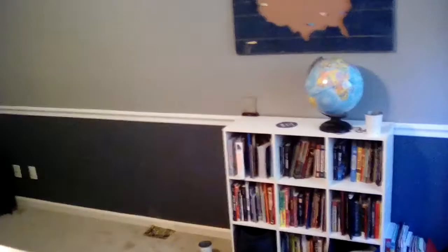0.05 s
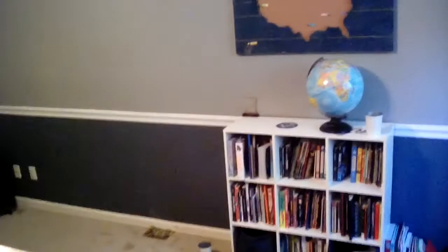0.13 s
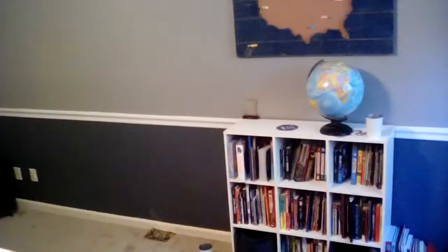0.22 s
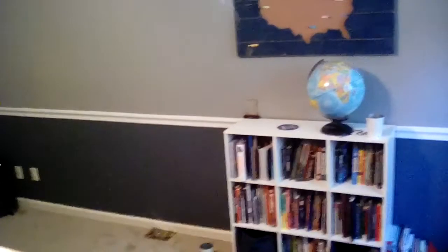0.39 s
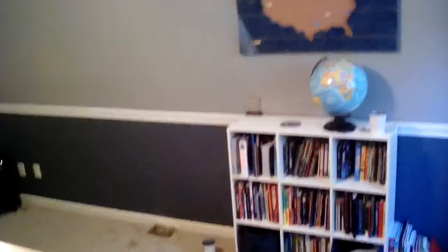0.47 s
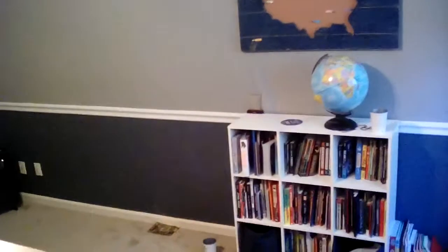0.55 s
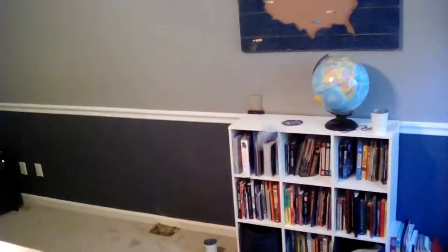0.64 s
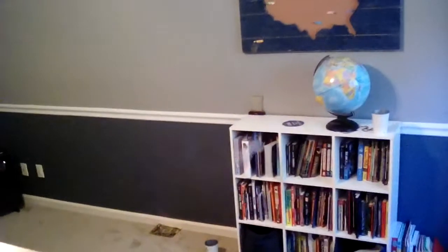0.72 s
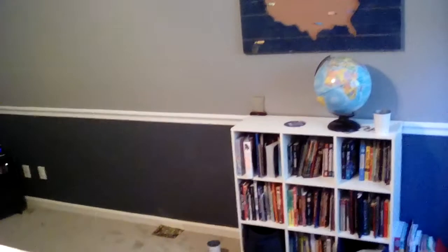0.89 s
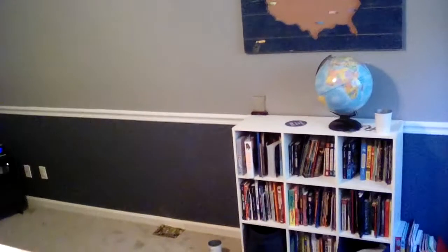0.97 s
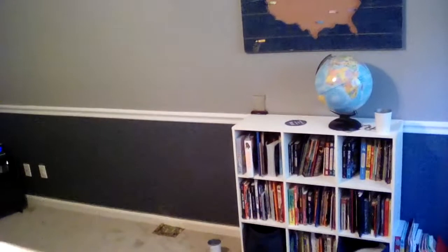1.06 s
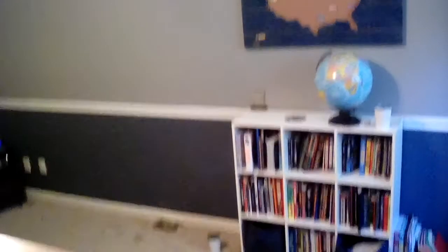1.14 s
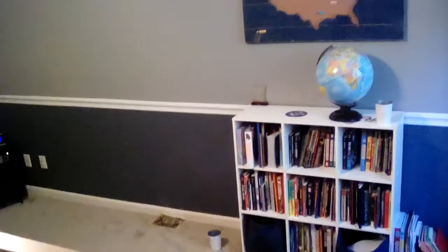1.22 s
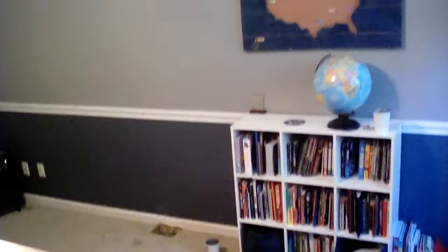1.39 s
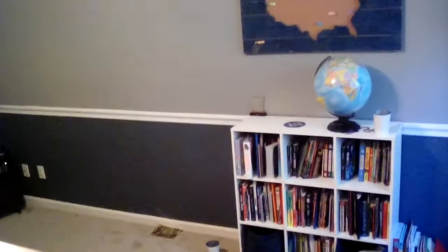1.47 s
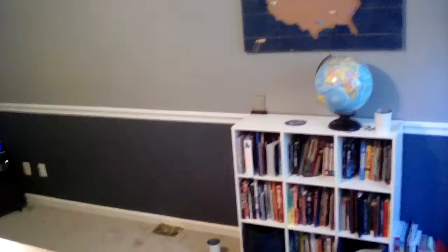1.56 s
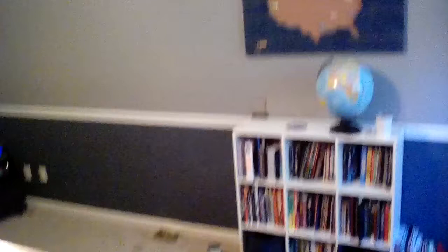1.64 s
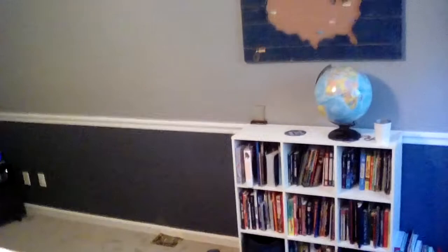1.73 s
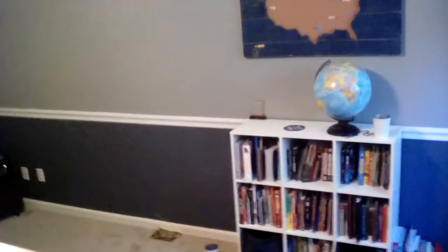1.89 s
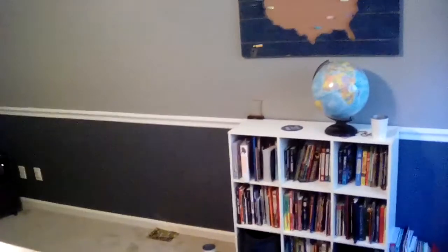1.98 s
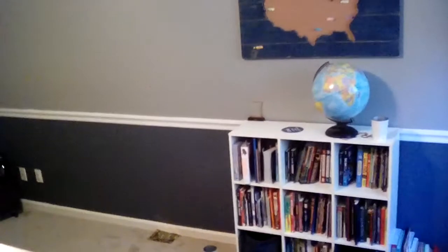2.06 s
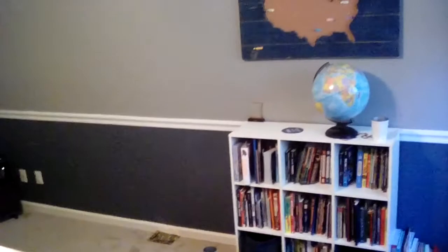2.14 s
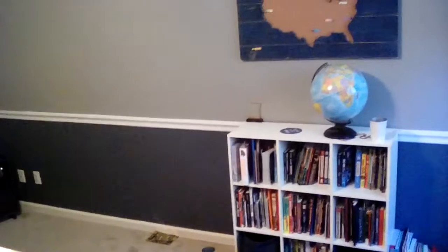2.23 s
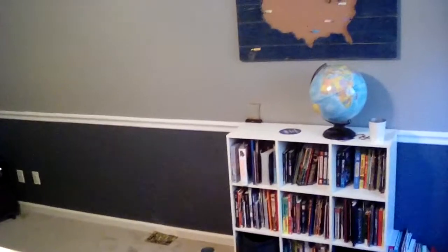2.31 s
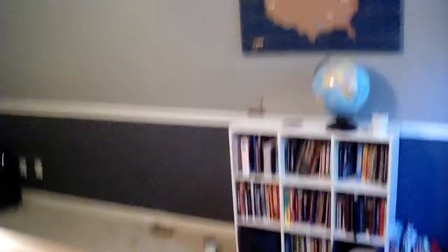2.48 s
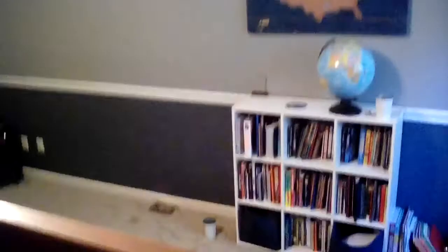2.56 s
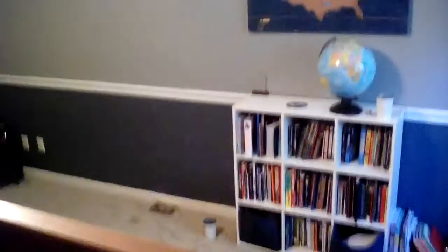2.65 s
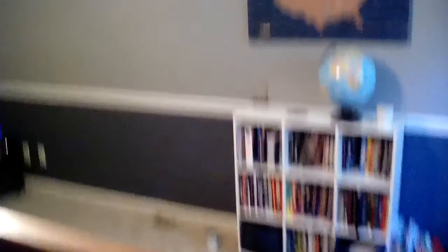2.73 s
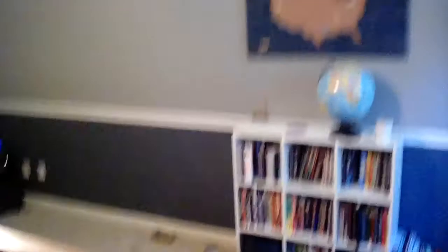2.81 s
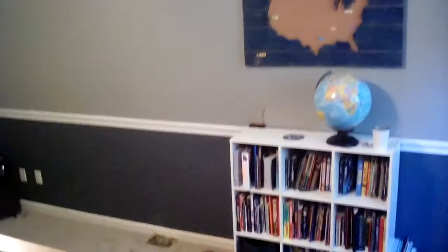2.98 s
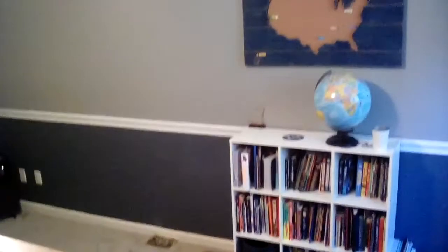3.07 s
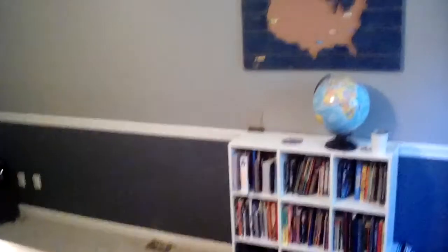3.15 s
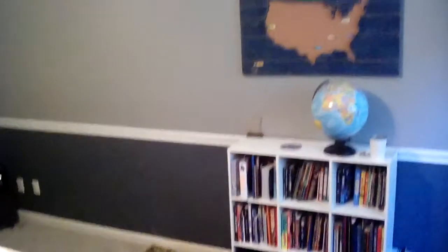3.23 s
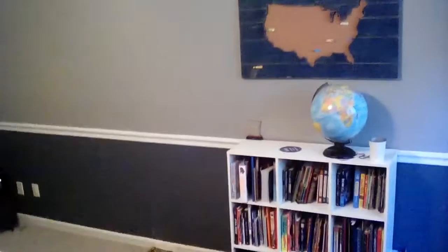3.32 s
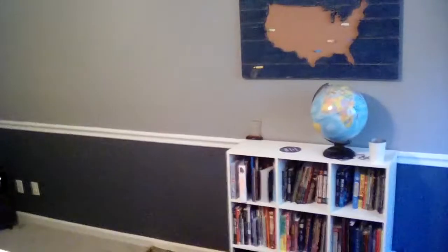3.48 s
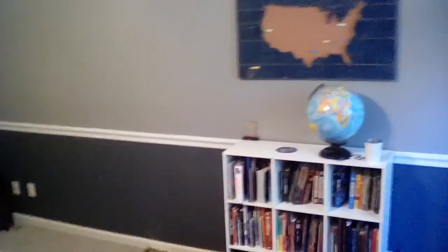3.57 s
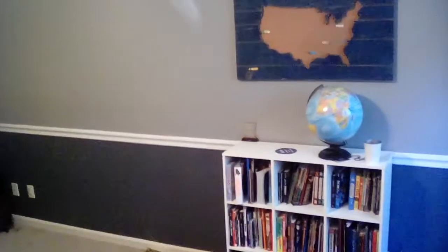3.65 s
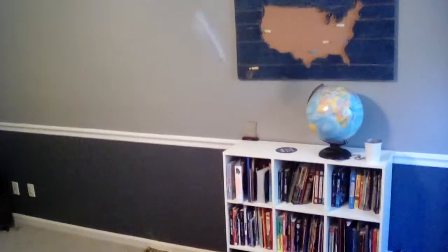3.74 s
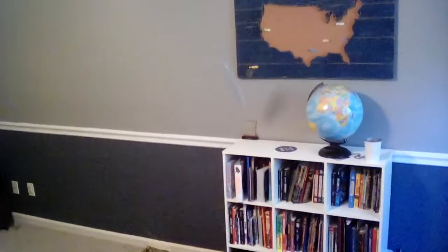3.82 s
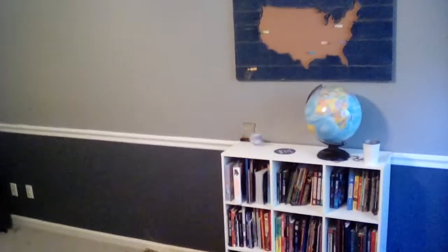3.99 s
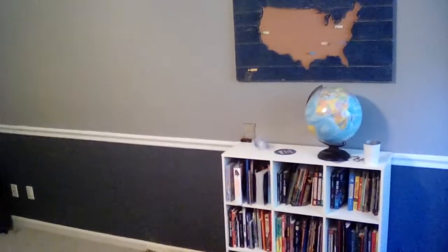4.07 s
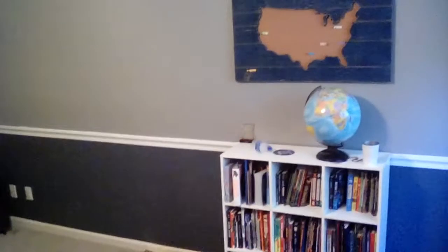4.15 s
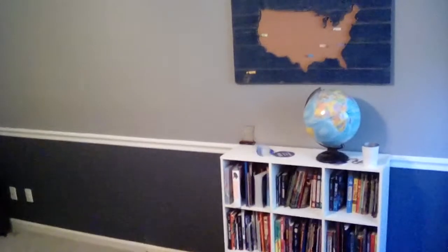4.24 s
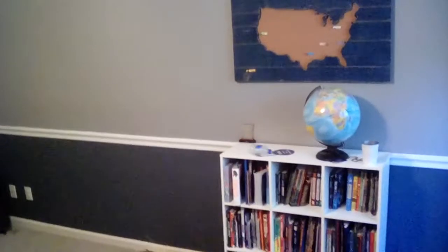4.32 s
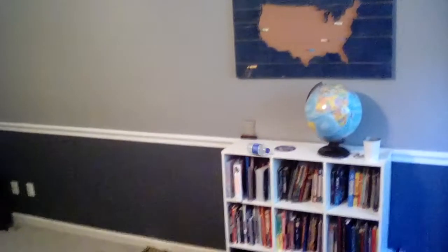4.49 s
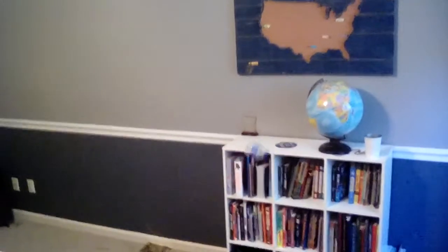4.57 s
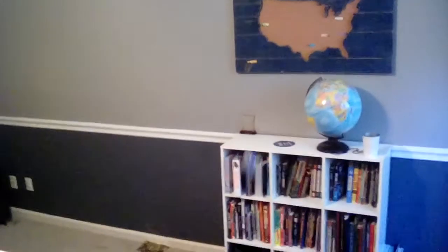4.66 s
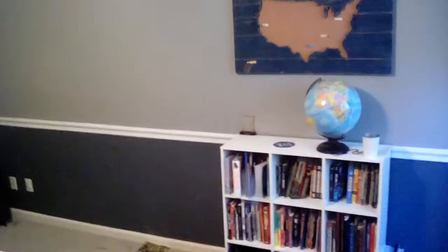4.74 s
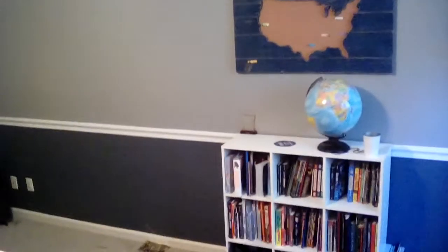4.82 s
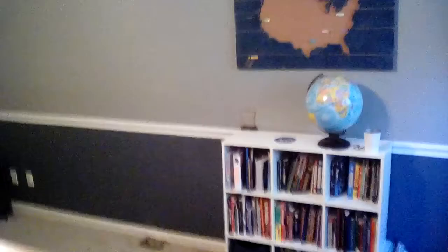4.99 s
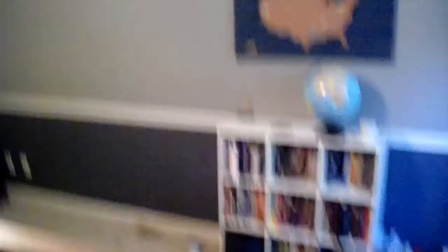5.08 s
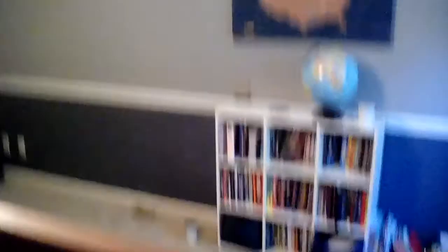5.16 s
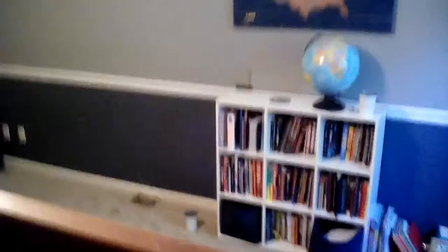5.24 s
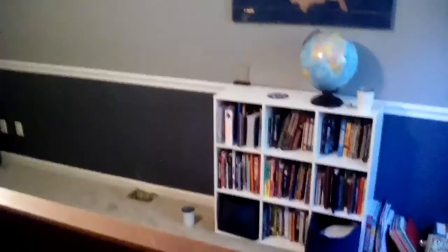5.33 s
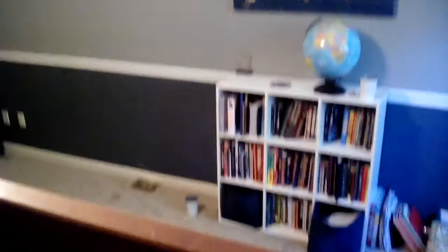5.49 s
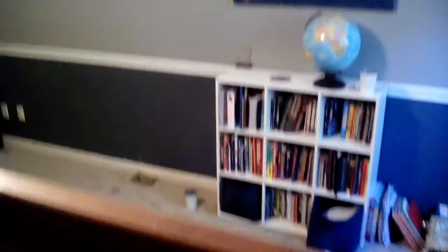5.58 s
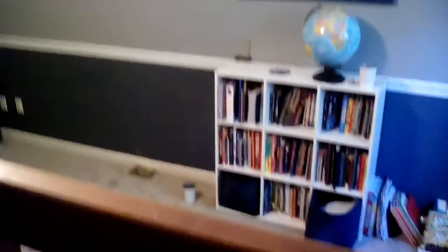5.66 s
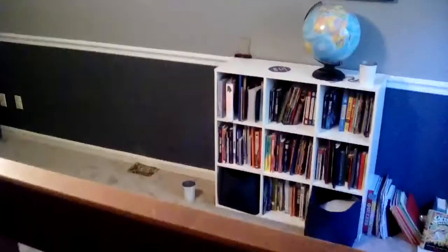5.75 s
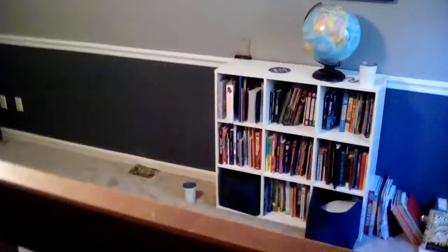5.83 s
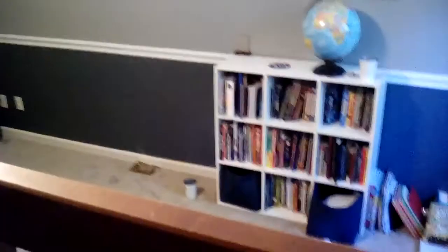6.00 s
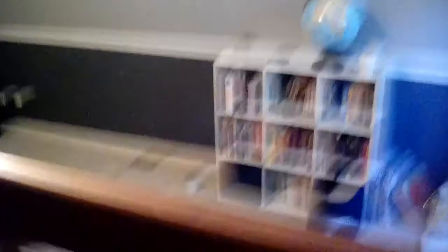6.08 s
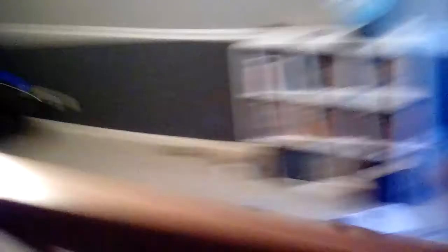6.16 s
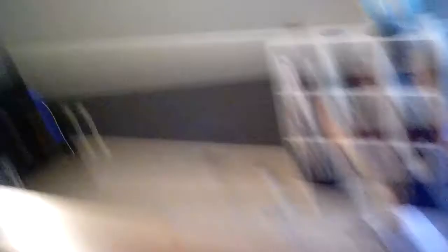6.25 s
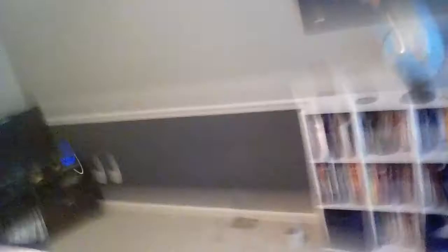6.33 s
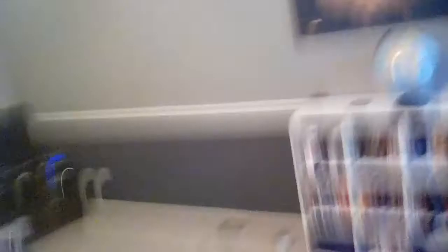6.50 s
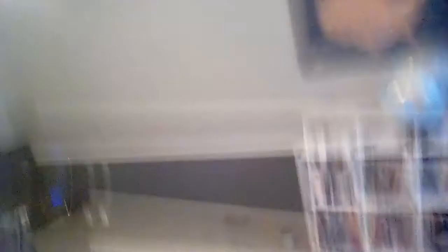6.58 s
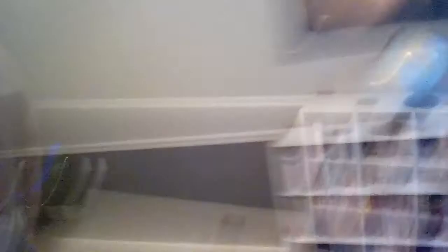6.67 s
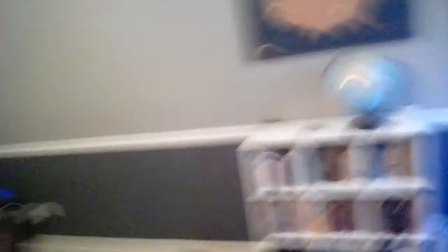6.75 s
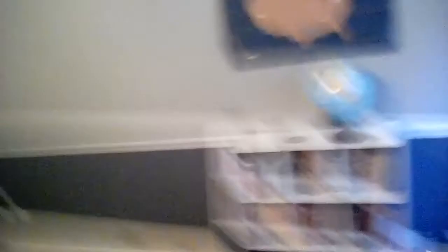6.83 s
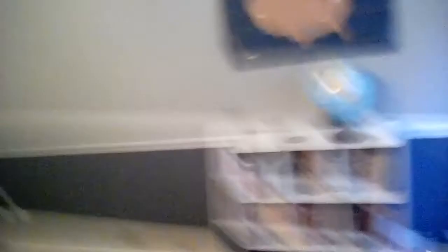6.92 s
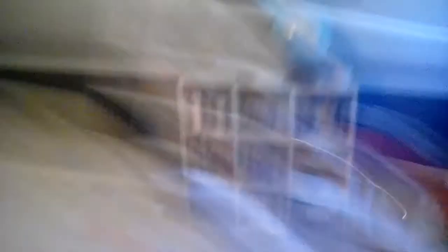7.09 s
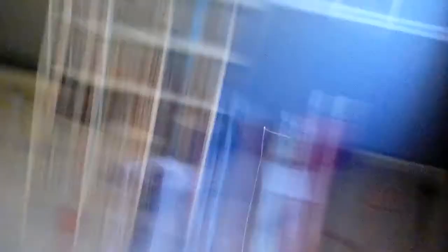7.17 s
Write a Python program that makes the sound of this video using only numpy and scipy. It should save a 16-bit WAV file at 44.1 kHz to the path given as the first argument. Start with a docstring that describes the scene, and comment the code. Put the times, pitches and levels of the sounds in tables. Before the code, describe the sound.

A quiet small bedroom with soft ventilation hush and a faint low drone. At 0 to 0.1 s, thin plastic crinkles, a faint squeak and low water gulps. At 0.77 s a part-filled plastic bottle hits a wooden bookcase across the room: thud, hollow knock, bright crackle, ringing wood and a brief slosh, with weaker rebounds to 0.87 s. It drops on carpet at 1.24 s with a dull boomy thump, and again more softly at 1.65 s. Small gulps near 1.9 s and light crinkles around 3.1 to 3.5 s. At 4.1 s a second bottle strikes harder, a sharp double knock, then a faint tap at 4.28 s and a soft double carpet thud at 5.2 s. Faint crinkles follow. From 6.2 s the phone is handled close and dry: low bumps, grainy sleeve swishes, a short scrape at 6.74 s, snaps, the loudest at 6.81 s, then fading bumps.

```python
"""In a small bedroom, part-filled plastic water bottles hit a bookcase, bounce off and drop on the carpet.
Each landing is a thud, a hollow knock and a crackle of thin plastic (decaying runs of clicks, coloured by
filters), with ringing wood and bottle walls. Gliding low notes are the water; dying clicks are the crinkling.
At the end the phone is grabbed: ringing bumps and snaps, a scrape and a sleeve's grainy hiss.
Soft filtered noise and one low drone are the air; squeaks of rubbed plastic come now and then."""
import sys
import numpy as np
from scipy import signal
from scipy.fft import rfft, irfft
from scipy.io import wavfile

SR = 44100
rng = np.random.default_rng(int(sys.argv[2]) if len(sys.argv) > 2 else 0)


def int16_out(signal):
    """Quantize to a 16-bit WAV file."""
    q = np.round(np.clip(np.atleast_2d(signal).T, -1, 1) * 32767)
    wavfile.write(sys.argv[1], SR, q.astype(np.int16))


N = 317961
TOP_HZ = 16000  # highest pitch kept
SIZE = 32768  # samples in one short sound
AGE = np.arange(SIZE) / SR  # seconds since a short sound began
TIME = np.arange(N) / SR  # seconds since the scene began


def undb(db):
    """Turn decibels into a gain."""
    return 10 ** (np.asarray(db) / 20)


def add(out, start_s, sound):
    """Mix a sound into out from start_s on."""
    start = max(int(start_s * SR), 0)
    out[start:start + len(sound)] += sound[:N - start]


def along(hz, points):
    """Read a value between (pitch, value) points, with pitch on a log scale."""
    pitch_hz, value = np.transpose(points)
    return np.interp(np.log(np.maximum(hz, 1)), np.log(pitch_hz), value)


def colour(sound, points, size=4096):
    """Filter a sound to the given (pitch_hz, level_db) curve without any sound before its start."""
    gain = undb(along(np.fft.rfftfreq(size, 1 / SR), points))
    # folding the cepstrum forward puts the filter's energy as early as possible
    cepstrum = irfft(np.log(gain))
    cepstrum[1:size // 2] *= 2
    cepstrum[size // 2 + 1:] = 0
    response = irfft(np.exp(rfft(cepstrum)))
    return signal.fftconvolve(sound, response)[:len(sound)]


def dull(sound, hz, order=4):
    """Take away the treble above hz."""
    return signal.sosfilt(signal.butter(order, min(hz, TOP_HZ), fs=SR, output="sos"), sound)


def resonate(sound, hz, sharpness):
    """Keep only the part of a sound that excites one resonance."""
    return signal.lfilter(*signal.iirpeak(hz, sharpness, fs=SR), sound)


def burst(sound, db):
    """Give a short sound the energy of 50 ms at this level."""
    return sound * undb(db) / np.sqrt(np.sum(sound ** 2) / (SR / 20))


def peak(sound, db):
    """Scale a sound to this peak level."""
    return sound * undb(db) / np.abs(sound).max()


def fade(t60):
    """Die away by 60 dB in t60 seconds."""
    return np.exp(-np.log(1000) * AGE / t60)


def rise(build_s):
    """Swell smoothly from silence."""
    return 1 - np.exp(-AGE / build_s)


def flicker(time, rate):
    """Join random levels by straight lines, rate of them a second."""
    knots = rng.standard_normal(int(time[-1] * rate) + 2)
    return np.interp(time * rate, np.arange(len(knots)), knots)


def ring(modes, spread):
    """Ring (pitch_hz, level_db, t60_s) modes, each starting its wave up to spread seconds late."""
    total = np.zeros(SIZE)
    for hz, db, t60 in modes:
        age = np.maximum(AGE - spread * rng.random(), 0)
        total += undb(db) * fade(t60) * np.sin(2 * np.pi * hz * age)
    return total


# how long the room's echo takes to fall by 60 dB: pitch_hz, t60_s
ROOM_FADES = [(80, .5), (210, 0.54), (560, 0.37), (1500, 0.37), (4000, 0.39), (7000, .33), (10000, 0.29),
              (15000, 0.26)]


def room(direct=3.0, early=2.9, early_t60=0.065, build_s=0.0015):
    """One path across the room: direct sound, strong near reflections, a tail with its own fade at each pitch."""
    noise = rfft(rng.standard_normal(SIZE))
    hz = np.fft.rfftfreq(SIZE, 1 / SR)
    centres, t60s = np.transpose(ROOM_FADES)
    tail = np.zeros(SIZE)
    for share, t60 in zip(np.eye(len(t60s)), t60s):
        band = irfft(noise * along(hz, np.c_[centres, share]))
        tail += band * fade(t60)
    tail *= (1 + early * fade(early_t60)) * rise(build_s)
    tail[0] += direct
    return tail


def across_room(sound):
    """Hear a short sound from the far side of the room."""
    return signal.fftconvolve(sound, room())[:SIZE]


def crush(decay_s, rate=900, scatter_db=4.5, first=1.0):
    """Buckling or rubbing surfaces give a dying run of uneven clicks, about rate of them a second."""
    happens = rng.random(SIZE) < rate / SR
    strength = undb(scatter_db * rng.standard_normal(SIZE))
    clicks = happens * strength * rng.choice([-1, 1], SIZE)
    clicks[0] = first
    return clicks * np.exp(-AGE / decay_s)


# colour of the crackling plastic shell: pitch_hz, level_db (relative)
SHELL_COLOUR = [(300, -18.5), (900, -7.5), (1700, -0.5), (3000, 0), (4400, -3), (6800, 3.5), (9000, -2.5),
                (10500, -9.5), (12500, -27), (15500, -28.5)]


def crackle(clicks, db, limit_hz=14500, hz_per_db=130):
    """The thin shell crackles; fainter crackles are given a lower treble limit."""
    treble_limit_hz = limit_hz + hz_per_db * max(db + 18.5, -40)  # limit_hz holds at -18.5 dB
    return burst(dull(colour(clicks, SHELL_COLOUR), treble_limit_hz, order=6), db)


# colour of the quiet air: pitch_hz, level_db (relative)
AIR_COLOUR = [(15, -44.5), (25, -10.5), (55, 1.5), (108, -6), (137, -3.5), (161, -12), (195, -7.5),
              (335, -19), (962, -28), (2690, -30.5), (2910, -35), (3520, -33.5), (5730, -30.5), (8360, -39),
              (16000, -51)]


def air(drone_hz=135, width_hz=22, drone_db=-69, hush_db=-66):
    """Quiet ventilation rumble that excites one low resonance of the room."""
    hush = colour(rng.standard_normal(N), AIR_COLOUR)
    drone = resonate(hush, drone_hz, drone_hz / width_hz)
    return hush / np.std(hush) * undb(hush_db) + drone / np.std(drone) * undb(drone_db)


# colour of the cloth hiss: pitch_hz, level_db (relative)
CLOTH_COLOUR = [(150, 7.5), (450, 5.5), (900, -1), (1500, -2.5), (2800, -6), (4200, -8.5), (5500, -3.5),
                (7500, -2.5), (10200, -11), (11600, -30.5), (16000, -35.5)]
# sleeve strokes: fastest_s (time of the loudest moment), half_length_s (until it falls to 37 %),
# level_db (of the smooth hiss at its loudest, before graininess), rub_pitch_hz
SLEEVE_STROKES = [(6.335, 0.057, -55.5, 4060), (6.451, .06, -51, 4200), (6.701, 0.64, -68.5, 3187),
                  (6.894, .1, -60.5, 6800)]
DRAG_HZ = 4200  # pitch of a middling rub


def sleeve(grain_db=1.0, zip_db=-6, wander=0.028, top_hz=10600, drag_db=-8):
    """Cloth fibres slip in a grainy hiss; the weave zips at each stroke's pitch and snags rumble in the case."""
    out = np.zeros(N)
    hiss = colour(rng.standard_normal(N), CLOTH_COLOUR)
    snags = colour(rng.standard_normal(N) * undb(4.6 * flicker(TIME, 110)), THUD_COLOUR)
    for fastest_s, half_length_s, db, rub_hz in SLEEVE_STROKES:
        loudness = flicker(TIME, 1100)
        zip_hz = rub_hz * (1 + wander * flicker(TIME, 60))
        weave = loudness * np.sin(2 * np.pi * np.cumsum(zip_hz) / SR)
        drag = undb(drag_db) * (DRAG_HZ / rub_hz) ** 2  # a slow, low rub snags more
        rub = hiss / np.std(hiss) + undb(zip_db) * weave / np.std(weave) + drag * snags / np.std(snags)
        out += rub * undb(db) * np.exp(-((TIME - fastest_s) / half_length_s) ** 2)
    smooth = dull(out + np.finfo(float).eps, top_hz, order=10)  # the tiny offset avoids slow arithmetic
    return smooth * undb(grain_db * flicker(TIME, 220))


# colour of a finger scuffing the case: pitch_hz, level_db (relative)
SCUFF_COLOUR = [(100, 2.5), (500, 8), (1300, -7), (2400, -9), (4000, -19), (8000, -24), (12000, -48.5)]


def scrape(start_s=6.739, length_s=0.027, case_hz=2190, level_db=-23, release_s=0.0024, sharpness=4, ring_db=5):
    """A finger drags over the phone case: a short, even run of slips makes it ring."""
    out = np.zeros(N)
    slips = colour(crush(0.82, rate=1600), SCUFF_COLOUR)
    slips *= np.exp(-np.maximum(AGE - length_s, 0) / release_s)
    case = resonate(slips, case_hz, sharpness)
    add(out, start_s, peak(slips + undb(ring_db) * case, level_db))
    return out


# fingers bumping the phone: start_s, pitch_hz, peak_db
PHONE_BUMPS = [(6.186, 338, -39.5), (6.2836, 118, -24), (6.297, 264, -26.5), (6.337, 493, -33),
               (6.366, 168, -28), (6.424, 396, -37), (6.438, 576, -34), (6.4589, 318, -27.5),
               (6.744, 195, -33.5), (6.775, 109.4, -28), (6.785, 331, -28.5), (6.857, 410, -37),
               (6.871, 128, -28)]
BUMP_HZ, BUMP_T60_S, BUMP_DAMPING = 300, 0.027, 0.94  # a middling bump; decay falls with pitch to this power
SCUFF_DB, SCUFF_DB_PER_OCTAVE = -4, 4  # scuff relative to a middling bump; a higher bump scuffs more
TICK_HZ, TICK_DB, TICK_T60_S = 2220, -10, 0.0038  # tick of the case; level relative to the bump's note


def bumps(scuff_s=0.0077, press_s=0.00023):
    """Each bump rings and ticks in the case, heard dry, while skin sticks and slips in a scuff."""
    out = np.zeros(N)
    for start_s, hz, db in PHONE_BUMPS:
        t60 = BUMP_T60_S * (BUMP_HZ / hz) ** BUMP_DAMPING
        note = ring([(hz, 0, t60), (TICK_HZ, TICK_DB, TICK_T60_S)], spread=0)
        add(out, start_s, peak(note * rise(press_s), db))
        scuff_db = db + SCUFF_DB + SCUFF_DB_PER_OCTAVE * np.log2(hz / BUMP_HZ)
        add(out, start_s, peak(colour(crush(scuff_s, rate=3700), SCUFF_COLOUR), scuff_db))
    return out


# ringing of the phone case: pitch_hz, level_db (relative), t60_s
CASE_MODES = [(350, -23.5, 0.01), (1120, -58, .004), (2193, -34, 0.0046), (3170, -6, 0.0075),
              (3890, -3.5, .008), (5086, 2.5, 0.007), (6420, 14.5, 0.002), (8610, -3.5, 0.0074),
              (10900, -4, 0.003), (14500, -6.5, .002)]
# the phone case snapping: start_s, peak_db (before its faint echo), hardness_hz (treble softens above this)
CASE_SNAPS = [(6.7388, -25.5, 4960), (6.7663, -29.5, 2480), (6.784, -8.5, 1804), (6.8148, 4, 9240)]


def snaps(room_db=-33):
    """The case snaps and rings at many pitches at once, nearly dry, with a faint echo of the room."""
    out = np.zeros(N)
    for start_s, db, hardness_hz in CASE_SNAPS:
        snap = peak(dull(ring(CASE_MODES, spread=0.000099), hardness_hz, order=1), db)
        echo = across_room(snap)
        add(out, start_s, snap + undb(room_db) * echo * np.std(snap) / np.std(echo))
    return out


# faint squeaks of rubbed plastic: start_s, pitch_hz, level_db (energy as 50 ms at this level)
PLASTIC_SQUEAKS = [(.002, 775, -59), (.17, 2160, -75.5), (.173, 3166, -77), (2.66, 3020, -78.5),
                   (6.15, 3266, -71)]


def squeaks(sharpness=30, decay_s=0.057):
    """A run of tiny slips, heard across the room, excites one narrow resonance."""
    out = np.zeros(N)
    for start_s, hz, db in PLASTIC_SQUEAKS:
        slips = across_room(crush(decay_s))
        add(out, start_s, burst(resonate(slips, hz, sharpness), db))
    return out


# the bottle flexing in the hand or rolling over:
# start_s, shell_db (crackle energy as 50 ms at this level), decay_s (clicks fall to 37 %)
BOTTLE_CRINKLES = [(.002, -58, 0.042), (0.09, -55.5, 0.00068), (1.208, -60.5, 0.0013),
                   (2.147, -74.5, 0.032), (2.608, -78, .011), (3.114, -63, 0.042), (3.382, -63.5, 0.021),
                   (3.456, -68.5, 0.0065), (5.474, -64.5, 0.067), (5.83, -72, 0.078), (6.583, -54.5, 0.042)]


def crinkles(knock_db=-7):
    """Light flexing crackles the shell and knocks the body more faintly, by knock_db."""
    out = np.zeros(N)
    for start_s, shell_db, decay_s in BOTTLE_CRINKLES:
        flex = across_room(crush(decay_s))
        knock = burst(colour(flex, KNOCK_COLOUR), shell_db + knock_db)
        add(out, start_s, crackle(flex, shell_db) + knock)
    return out


# the water gulps between throws: start_s, pitch_hz (at the start), peak_db (direct sound),
# glide_octaves_per_s
WATER_GULPS = [(.003, 221, -46, -0.95), (.092, 171, -42.5, -.8), (1.859, 199.2, -54.5, .8),
               (1.936, 237, -59.5, 0.77), (3.461, 335, -47, .6), (3.592, 422, -61, .8)]
GULP_CYCLES = 150  # a gulp falls by 60 dB in this many cycles of its starting pitch
JOLT_DB, JOLT_T60_S, JOLT_GLIDE = 7.5, 0.29, .2  # jolt at a landing: peak over thud_db, decay, octaves per s


def water(swell_s=.005, wobble=0.81, room_db=-8):
    """Water and trapped air bounce with a low, unsteady note that bends with the pocket; the room blurs it."""
    out = np.zeros(N)
    notes = []
    for start_s, _, _, thud_db, *_, water_hz, lead_s in BOTTLE_LANDINGS:
        notes.append((start_s - lead_s, water_hz, thud_db + JOLT_DB, JOLT_T60_S, JOLT_GLIDE))
    for start_s, hz, db, glide in WATER_GULPS:
        notes.append((start_s, hz, db, GULP_CYCLES / hz, glide))
    for start_s, hz, db, t60, glide in notes:
        phase = 2 * np.pi * np.cumsum(hz * 2 ** (glide * AGE)) / SR
        slosh = 1 + wobble * flicker(AGE, 150)
        note = np.sin(phase) * slosh * fade(t60) * rise(swell_s)
        blur = across_room(note * fade(0.037))
        add(out, start_s, peak(note, db) + peak(blur, db + room_db))
    return out


def floorboards(boom_hz=73.5, t60_s=0.39, boom_db=-5, swell_s=0.0046):
    """A bottle on the carpet makes the boards below boom, their peak set boom_db from thud_db."""
    out = np.zeros(N)
    boom = ring([(boom_hz, 0, t60_s)], spread=0) * rise(swell_s)
    for start_s, surface, _, thud_db, *_ in BOTTLE_LANDINGS:
        if surface == "carpet":
            add(out, start_s, peak(boom, thud_db + boom_db))
    return out


# a bottle lands or rebounds: start_s (full contact), surface, then four levels (energy as 50 ms, before the
# soft onset): knock_db, thud_db, shell_db (crackle), wall_db (bottle's own ring); then crush_s (shell clicks
# fall to 37 %), wall_pitch_hz, water_pitch_hz (at the start), lead_s (edge touches this early; 0 = flat)
BOTTLE_LANDINGS = [(.770, "shelf", -29, -32.5, -23.5, -36, .011, 580, 214, 0.0082),
                   (.797, "shelf", -41.5, -40.5, -43, -41.5, .008, 1530, 200.6, 0.0012),
                   (.874, "shelf", -59, -74, -50, -56, .01, 1550, 214, 0.0015),
                   (1.241, "carpet", -39, -34, -37, -36.5, .011, 300, 138, 0.011),
                   (1.655, "carpet", -50, -47.5, -47.5, -48.5, 0.013, 1719, 138, .011),
                   (4.0975, "shelf", -19, -28.5, -23.5, -24, .004, 1170, 150, .006),
                   (4.108, "shelf", -24.5, -30.5, -30, -23, 0.0025, 501.9, 282, 0),
                   (4.278, "shelf", -46, -50.5, -48, -63, 0.0024, 700, 204, 0.00011),
                   (5.182, "carpet", -50.5, -38.5, -46.5, -41, .009, 351.8, 219.9, 0.0014),
                   (5.221, "carpet", -67, -38.5, -56, -48, .008, 390, 150, 0.0026)]
EDGE_DB, EDGE_CRUSH = -5, .65  # the edge touches weaker, and with this share of the crush time
CAP_RATIO, CAP_DB = 2.45, 6  # on the hard shelf the stiff edge rings higher; gain added on top of EDGE_DB


def contacts():
    """A tilted bottle touches with its edge, then slaps down in full."""
    for start_s, surface, knock_db, thud_db, shell_db, wall_db, crush_s, wall_hz, _, lead_s in BOTTLE_LANDINGS:
        wood_db = knock_db + (-3 if surface == "shelf" else -5)  # ring of the bookcase
        if lead_s > 0:
            edge_hz, ring_db = wall_hz, wall_db
            if surface == "shelf":
                edge_hz, ring_db = wall_hz * CAP_RATIO, wall_db + CAP_DB
            edge_levels = np.array([knock_db, thud_db, shell_db, ring_db, wood_db]) + EDGE_DB
            yield start_s - lead_s, edge_levels, crush_s * EDGE_CRUSH, edge_hz
        yield start_s, (knock_db, thud_db, shell_db, wall_db, wood_db), crush_s, wall_hz


# ringing bookcase panels: pitch_hz, level_db (relative)
BOOKCASE_PANELS = [(151, -6), (187, -5), (282, 0.5), (398, 0.5), (495, 0.5), (535, 0), (622, -1.5),
                   (684, -3.5), (788, -2.5), (980, -3.5), (1147, 0.5), (1260, 0.5), (1533, -4),
                   (1750, -8.5), (2045, -1), (2262, -8.5), (2930, -4), (3212, -6.5)]
# colour of the thump on a surface: pitch_hz, level_db (relative)
THUD_COLOUR = [(30, -30), (65, -12.5), (95, -6), (140, -3), (280, -1.5), (400, -7.5), (600, -23),
               (1500, -56)]
# colour of the hollow bottle body: pitch_hz, level_db (relative)
KNOCK_COLOUR = [(100, -22.5), (250, -9.5), (420, -2.5), (600, 2), (900, -0.5), (1250, -2.5), (1900, -7),
                (3000, -10), (5000, -22.5), (12000, -42)]


def bottles(wall_q=8, wall_t60=.3, wood_t60=0.29, seat_s=.0015):
    """Each contact thumps the surface, knocks the hollow body, buckles the shell and rings the bookcase."""
    out = np.zeros(N)
    # wood_t60 is the decay at 500 Hz; higher modes die sooner
    panels = [(hz, db, wood_t60 * (500 / hz) ** 0.23) for hz, db in BOOKCASE_PANELS]
    for start_s, (knock_db, thud_db, shell_db, wall_db, wood_db), crush_s, wall_hz in contacts():
        blow = across_room(crush(crush_s / 2))
        thud = burst(colour(room() * fade(0.95), THUD_COLOUR), thud_db)
        knock = burst(colour(blow, KNOCK_COLOUR), knock_db)
        shell = crackle(across_room(crush(crush_s)), shell_db)
        wood = burst(ring(panels, spread=.008), wood_db)
        # cap, side or base: the part that lands sets the pitch of the bottle's own short ring
        wall = burst(resonate(blow, wall_hz, wall_q) * fade(wall_t60), wall_db)
        # the soft bottle takes a moment to press home
        add(out, start_s, (thud + knock + shell + wood + wall) * rise(seat_s))
    return out


def scene():
    """Everything at one microphone."""
    background = air() + sleeve()
    phone = scrape() + bumps() + snaps()
    bottle = squeaks() + crinkles() + water() + floorboards() + bottles()
    return (background + phone + bottle)[None]


def record(dry, low_cut_hz=45, ceiling=.8):
    """The phone thins the deep bass, rounds the loudest peaks and cuts the top."""
    thin = signal.sosfilt(signal.butter(2, low_cut_hz, "high", fs=SR, output="sos"), dry)
    rounded = ceiling * np.tanh(thin / ceiling)
    return signal.sosfilt(signal.ellip(8, .2, 70, TOP_HZ, fs=SR, output="sos"), rounded)


dry = scene()
out = record(dry)
int16_out(out)
```